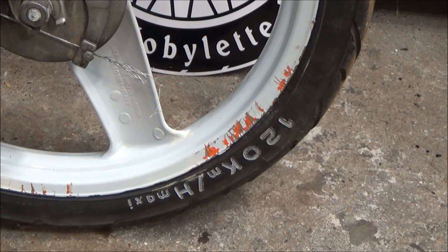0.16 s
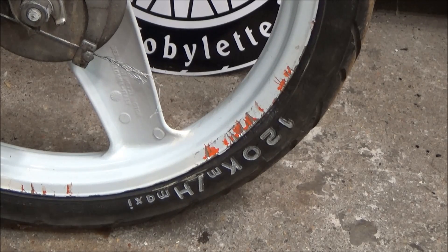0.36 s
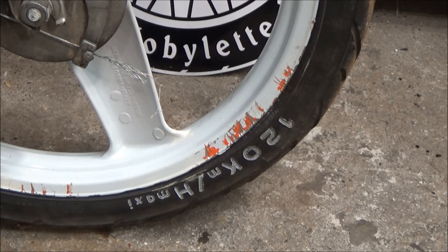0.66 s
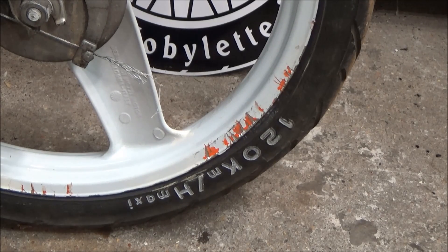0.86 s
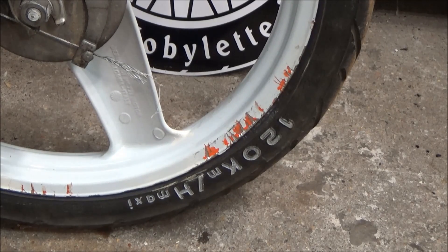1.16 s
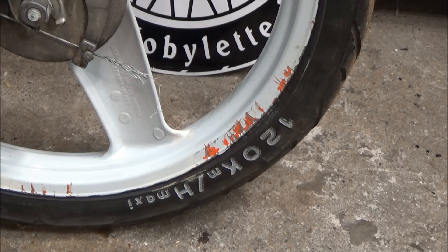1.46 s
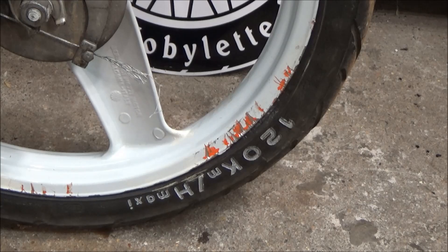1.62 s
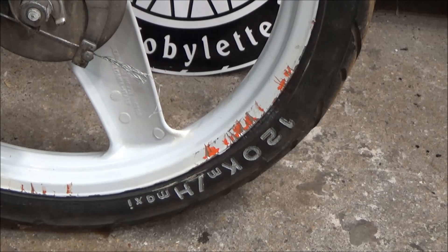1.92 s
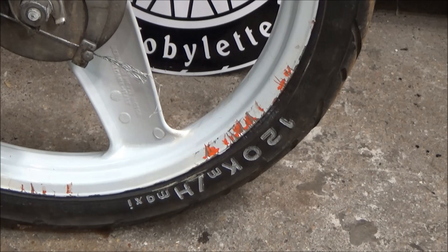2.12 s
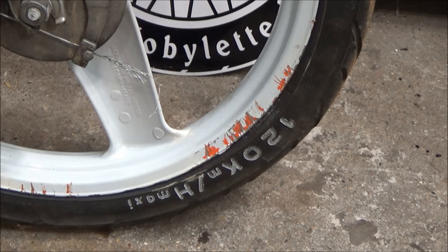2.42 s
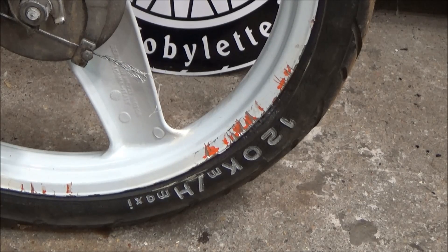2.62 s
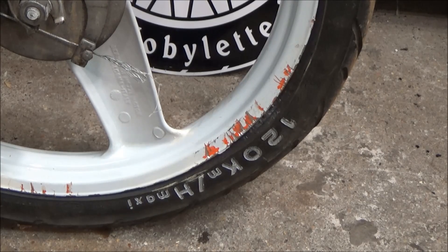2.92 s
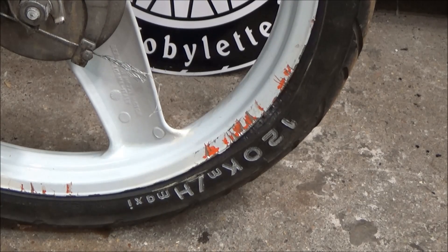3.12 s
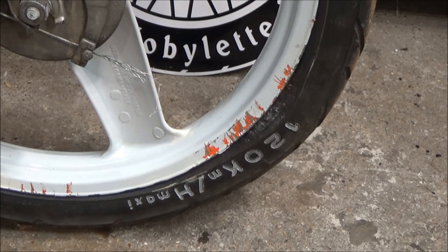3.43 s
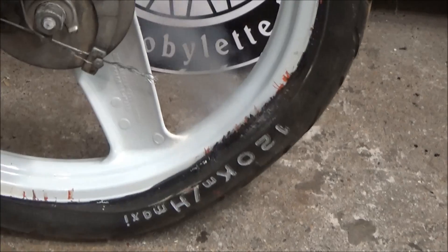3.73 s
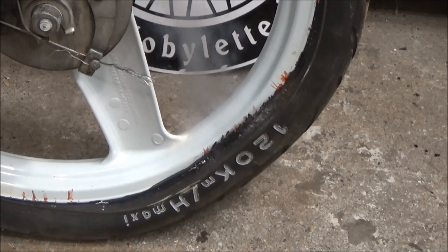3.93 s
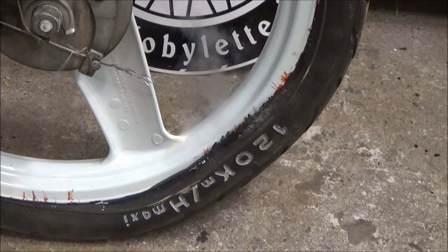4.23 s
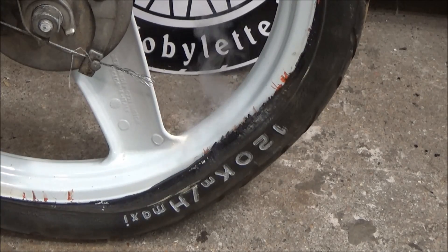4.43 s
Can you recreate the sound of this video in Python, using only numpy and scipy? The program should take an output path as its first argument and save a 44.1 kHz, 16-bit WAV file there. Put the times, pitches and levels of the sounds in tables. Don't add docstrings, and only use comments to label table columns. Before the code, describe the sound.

A small tyre on a cast wheel is overfilled indoors, heard close up. First a short valve puff and a few soft clicks and knocks over quiet room tone; then a piercing, steady air hiss, slowly rising, with hollow bead knocks. The bead stutters, the tyre tears and explodes in a dense limited blast. The wheel and room boom deeply while debris rustles faintly and dies away.

```python
import sys
import numpy as np
from scipy import signal
from scipy.fft import rfft, irfft
from scipy.io import wavfile

SR = 44100
rng = np.random.default_rng(int(sys.argv[2]) if len(sys.argv) > 2 else 0)


def bounce(signal):
    frames = np.transpose(np.atleast_2d(signal))
    limited = np.clip(frames, -1, 1)
    pcm = np.round(limited * 32767).astype(np.int16)
    wavfile.write(sys.argv[1], SR, pcm)


def to_linear_factor(level_db):
    exponent = np.asarray(level_db, float) / 20
    return 10 ** exponent


N = 201477
HZ = np.maximum(np.fft.rfftfreq(N, 1 / SR), 1)

# frequency in Hz, density in dB per Hz.
JET_SPECTRUM = [(290, -21.5), (500, -17.5), (1200, -20), (1310, -18), (1990, -15.5), (2170, -14.5),
                (2670, -18.5), (3320, -15), (3570, -6), (4120, -4.5), (5440, -13.5), (6290, -18),
                (11300, -9.5), (15100, -25), (16200, -38)]
# frequency in Hz, width in Hz, level in dB.
AIR_RESONANCES = [(2110, 32, -10), (2225, 22, -6), (3992, 40, 0), (3150, 35, -14), (3606, 35, -5.5),
                  (4065, 44, 2.5), (4350, 50, -6), (4517, 48, -2), (4915, 79, -10.5), (5940, 170, -15.5),
                  (6250, 84, -24), (6480, 40, -25), (7820, 166, -12), (8290, 76, -10), (8670, 90, -11.5),
                  (9820, 410, -12), (10720, 80, -9.5), (10900, 70, -8), (11500, 53, -7.5), (12200, 67, -14),
                  (11900, 66, -18), (12500, 200, -11), (12700, 130, -12), (13700, 200, -17),
                  (14200, 41, -16), (14800, 170, -19), (15200, 37, -23)]
# (frequency in Hz, left-right
# dB).
AIR_STEREO = [
    [(60, 1.0), (130, 0.84), (290, 8.5), (640, 0.5), (1410, 3), (3100, 4.3), (6820, 5), (15000, 2.15)],
    [(60, 0.0), (240, -2), (950, 1), (3770, -1), (15000, 2.5)],
]
# time in seconds, flow in dB.
PUFF_FLOW = [
    (0.0, -39),
    (0.06, -37),
    (0.095, -37),
    (0.14, -50.5),
    (.2, -61),
    (.38, -75),
]
# time in seconds, flow in dB.
FILL_FLOW = [
    (1.615, -66),
    (1.645, -34.5),
    (1.723, -35.5),
    (1.75, -36.5),
    (2.28, -34),
    (2.77, -31),
    (3.47, -29.5),
    (3.53, -30),
    (3.575, -36),
]
PUFF_JET_DB, PUFF_DULL_DB = -2.0, -2.5
JET_DB, JET_FOLLOWS_DB_PER_DB = -1, .2
LEAK_S, LEAK_DB, LEAK_HALF_S = 3.525, 3.5, 0.059
SING_DB_PER_S = 1

# frequency in Hz, density in dB per Hz.
BURST_SPECTRUM = [(53, -32), (90, -1), (107, -9), (205, -12.5), (323, -8), (360, 2.5), (402, -6.5),
                  (633, -9), (690, -5), (956, -7), (1750, -11.5), (10400, -20), (16000, -38)]
# (frequency in Hz, left-right dB).
BURST_STEREO = [
    [(60, 0.88), (130, 0.9), (290, 0.93), (640, 0.56), (1410, 0.61), (3100, 0.73), (6820, 0.75), (15000, 1)],
    [(60, -5), (240, 7), (950, 2), (3770, -0.5), (15000, 1.5)],
]
# low edge in Hz, high edge in Hz.
ROAR_RANGES = [(90, 220), (220, 650), (650, 1800), (1800, 6000), (6000, 16000)]
# level in dB, rise in seconds, fall in dB per second.
TEAR = [(-10.5, 0.027, 350), (-13, 0.0071, 157), (-13, 0.00044, 160), (-12, .0005, 290),
        (-19.5, .0005, 344)]
# level in dB, rise in seconds, sag in dB per second while emptying,
# first flash in dB over the level.
BLAST = [(-28.5, 0.048, 5, 2), (-20, 0.0075, 45, -7), (-9.5, 0.0089, 89, -21), (-14.5, .0007, 47, 1),
         (-20, .0007, 75, 10.5)]
# fall in dB per second, shop echo in dB, echo fall in dB per second.
AFTER_BLAST = [(50, -47, 36), (75, -44, 39), (175, -45, 54), (184, -44.5, 47), (144, -42, 66)]
# start in seconds, peak in dB.
FRONTS = [
    (3.5738, -3),
    (3.5786, -5),
    (3.5852, -6),
]
TEAR_S, BLAST_S, EMPTY_S = 3.574, 3.642, 3.761
FLASH_T60_S = 0.079
SLUMP_S, SLUMP_DB, SLUMP_HALF_S = 3.778, -25, 0.013

# frequency in Hz, level in dB, T60 in seconds.
BOOM_MODES = [(74, -0.5, 1.36), (143.3, -15, 1.38), (292, -15.5, 1.13), (356, -15, 1.39), (387, -20, 1.25),
              (443.6, -13.5, 1.01), (617, -19.5, 0.98), (695, -16, 0.81), (840, -25, 0.91),
              (870, -35, 0.72), (1150, -38, 2), (1217, -24, 0.79), (1420, -37, 0.61)]
# start in seconds, level in dB, rise in seconds.
BOOM_ONSETS = [
    (3.765, -13.5, 0.011),
    (3.655, -12.5, 0.0058),
    (3.582, -8, 0.0028),
]

# frequency in Hz, level in dB, T60 in seconds.
RIM_MODES = [(2020, -29, 1.5), (2134, 1, 1.4), (2216, -2, 1.4), (4237, -19, 1), (5230, -13, 1.1),
             (7710, -2, 1), (8070, -3.5, 1.13), (8530, -6, 1), (9140, -9, 0.99), (11460, -11, 0.82)]
# frequency in Hz, level in dB, T60 in seconds.
SPOKE_MODES = [(1112, -7, 2.0), (2290, -1.5, 0.98), (4000, 0.5, 0.99), (6600, -7, 1.8), (9765, 9, 0.34)]

# start in seconds, peak in dB, crack in dB, left-right dB.
KNOCKS = [
    (1.151, -40, 2.5, 4),
    (1.235, -22, -1.5, 2.5),
    (2.503, -20, -3, 2.5),
    (2.551, -20, -2, 1.5),
    (2.629, -22, -1.5, 3),
    (3.002, -19, -1, 2.5),
]
# frequency in Hz, level in dB, T60 in seconds.
TYRE_MODES = [(292, 8, 0.18), (355.6, 12, 0.12), (684, -5, 0.057), (916, -9, 0.33), (1150, -9, 0.22),
              (1394, -5, 0.082), (1900, -35, 0.082), (1760, -15, 0.29), (2180, -17, 0.31),
              (2780, -12, 0.099), (3020, -14, 0.13), (3305, -12.5, 0.14), (5000, -11.5, 0.2),
              (6316, -15, 0.32)]
# centre in seconds, peak in dB, frequency in Hz, half length in seconds.
SLIPS = [
    (3.532, -22.5, 1240, 0.00063),
    (3.545, -13, 1910, 0.0004),
    (3.55, -14, 1920, 0.00061),
    (3.5577, -14, 1900, 0.00047),
    (3.5646, -20, 1780, 0.0006),
    (3.569, -26, 1800, 0.0005),
    (3.6172, 0.5, 1310, 0.00032),
]
# start in seconds, peak in dB, frequency in Hz, T60 in seconds.
TICKS = [(.095, -19, 9000, 0.0066), (.578, -39.5, 8700, 0.0066), (.634, -35, 8850, 0.0063),
         (1.59, -33.5, 2900, 0.014), (1.644, -24, 5060, 0.017), (1.655, -16, 5130, 0.028),
         (1.716, -12.5, 3250, 0.025), (1.716, -14.5, 9300, 0.0083), (3.5312, -3, 8460, .008),
         (3.591, -6, 10500, 0.013), (3.607, -3.5, 11500, 0.0084), (3.607, -3.5, 5000, 0.0057),
         (4.128, -40, 7940, .008)]
# start in seconds, peak in dB, frequency in Hz, T60 in seconds.
THUDS = [
    (1.403, -31, 302, 0.044),
    (1.403, -32.5, 674, 0.032),
    (1.473, -39, 467, 0.075),
    (1.486, -33.5, 507, 0.07),
    (1.834, -31, 452, 0.033),
    (2.56, -31.5, 75, 0.096),
]
# start in seconds, peak in dB, frequency in Hz, T60 in seconds.
SQUEAKS = [
    (3.415, -23, 1620, 0.12),
    (4.012, -34, 1750, 0.14),
    (4.035, -33, 1700, 0.058),
]
ROOM_T60_S, ROOM_DB = 0.18, -10

# centre in seconds, level in dB, half length in seconds.
GUSTS = [
    (3.815, -36, 0.045),
    (3.92, -40.5, 0.042),
]
# centre in seconds, level in dB, half length in seconds,
# frequency in Hz, width in Hz.
HALO_PUFFS = [
    (3.82, -32.5, 0.046, 11200, 2500),
    (4.16, -58, .018, 14000, 3500),
]
WHISTLE_HZ, WHISTLE_RISE_HZ_PER_S = 11200, 3300

# frequency in Hz, density in dB per Hz.
GRIT_SPECTRUM = [(530, -47), (900, -22), (1320, -22), (1460, -8.5), (1880, -5.5), (4100, -7), (6110, -16.5),
                 (9650, -16.5), (13700, -34), (15400, -47), (16000, -74)]
# centre in seconds, scrape in dB, half length in seconds, rustle over scrape in dB.
SCRAPS = [
    (4.023, -50.5, 0.038, -5),
    (4.158, -56, 0.022, 2.5),
    (4.227, -53.5, 0.01, -4),
    (4.36, -44.5, 0.043, -2),
    (4.466, -53, 0.041, -3),
    (4.524, -46.5, 0.023, -2.5),
    (4.562, -47.5, .02, -2),
]
SCRAP_EDGE = 3.5

# frequency in Hz, density in dB per Hz.
FLOOR_SPECTRUM = [(260, -21), (450, -8), (589, -8.5), (635, -6.5), (782, -6), (1020, -7), (1400, -9),
                  (2360, -13), (2960, -13.5), (16000, -25.5)]
FLOOR_DB = -56
# (frequency in Hz, left-right dB).
FLOOR_STEREO = [
    [(60, 1), (240, 0.82), (950, 0.47), (3770, 0.35), (15000, 1)],
    [(60, 0.0), (240, 0.5), (950, 0.0), (3770, 0.099), (15000, 0.0)],
]
# frequency in Hz, width in Hz, level in dB.
HUM = [(575.4, 9.1, -64.5)]
# low edge in Hz, high edge in Hz, rest level in dB, climb start in seconds,
# climb in dB per second.
DRUMMING = [
    (45, 78.6, -64.5, 1.5, 5),
    (100, 450, -62.5, 0.22, 1.5),
]
DUCK_DB, RECOVER_DB_PER_S, CREEP_DB_PER_S = -14, 36, 0.9


def rms_one(x):
    return x / np.sqrt(np.mean(x ** 2) + 1e-20)


def at_hz(points):
    hz, value = np.transpose(points)
    return np.interp(np.log(HZ), np.log(hz), value)


def drift(rate_hz):
    r = np.exp(-80 * np.pi * rate_hz / SR)
    slow = signal.lfilter([1], [1, -2 * r, r * r], rng.standard_normal(N // 40 + 2002))[2000:]
    return np.interp(np.arange(N) / 40, np.arange(len(slow)), rms_one(slow))


def noise(spectrum, stereo):
    mid, side = rfft(rng.standard_normal((2, N)))
    alike = np.clip(at_hz(stereo[0]), 0, 1)
    lean = to_linear_factor(at_hz(stereo[1]) / 2)
    mid, side = np.sqrt(1 + alike) * mid, np.sqrt(1 - alike) * side
    pair = np.array([(mid + side) * lean, (mid - side) / lean])
    return irfft(to_linear_factor(at_hz(spectrum)) * pair, N)


def band(x, low_hz, high_hz):
    sos = signal.butter(3, [low_hz, high_hz], "band", fs=SR, output="sos")
    return rms_one(signal.sosfilt(sos, x))


def resonance(x, hz, width_hz):
    r = np.exp(-np.pi * width_hz / SR)
    poles = [1, -2 * r * np.cos(2 * np.pi * hz / SR), r * r]
    return signal.lfilter(np.array([1, 0, -1]) * (1 - r * r) / 2, poles, x)


def ring(clicks, hz, t60_s):
    r = to_linear_factor(-60 / (max(t60_s, .001) * SR))
    w = 2 * np.pi * hz / SR
    return signal.lfilter([0, np.sin(w)], [1, -2 * r * np.cos(w), r * r], clicks + 1e-18)


def add(out, piece, s, pan_db=0.):
    i = round(s * SR)
    piece = piece[:N - i]
    out[:, i:i + len(piece)] += piece * to_linear_factor([[pan_db / 2], [-pan_db / 2]])


def curve(rows, edge_s):
    s, db = np.transpose(rows)
    times = np.r_[s[0] - edge_s, s, s[-1] + edge_s]
    return np.interp(np.arange(N) / SR, times, np.r_[-120, db, -120])


def swell(s, half_s, edge=2):
    return np.exp(-np.abs((np.arange(N) / SR - s) / half_s) ** edge)


def room(x, t60_s, level_db):
    t = np.arange(round(.4 * SR)) / SR
    tail = rng.standard_normal((2, len(t))) * to_linear_factor(-60 * t / t60_s) * (t > .002)
    tail = signal.lfilter([1], [1, -.4], tail)
    tail = tail / np.sqrt(np.sum(tail[0] ** 2))
    return to_linear_factor(level_db) * signal.fftconvolve(x, tail, axes=1)[:, :N]


def air():
    jet = noise(JET_SPECTRUM, AIR_STEREO)
    white = noise([(100, 0), (16000, 0)], AIR_STEREO)
    sung = sum((-1) ** k * to_linear_factor(db + 2.0 * drift(2.4)) * resonance(white, hz, width_hz)
               for k, (hz, width_hz, db) in enumerate(AIR_RESONANCES))
    hiss = jet + to_linear_factor(3.0 + SING_DB_PER_S * (np.arange(N) / SR - 2.5)) * sung
    hiss = hiss + room(hiss[:1], t60_s=.08, level_db=-6)

    puff = to_linear_factor(curve(PUFF_FLOW, edge_s=.02))
    fill_db = curve(FILL_FLOW, edge_s=.005)
    sharp_db = JET_DB + JET_FOLLOWS_DB_PER_DB * (fill_db + 33) + LEAK_DB * swell(LEAK_S, LEAK_HALF_S)
    body = puff + to_linear_factor(fill_db)
    bright = to_linear_factor(PUFF_JET_DB) * puff + to_linear_factor(fill_db + sharp_db)
    dull = to_linear_factor(PUFF_DULL_DB) * puff * swell(0.063, 0.022)
    flow = body * band(hiss, 326, 7100) + bright * band(hiss, 7300, 16500) + dull * band(hiss, 2440, 3360)
    return to_linear_factor(0.25 * drift(25)) * flow


def burst():
    roar = noise(BURST_SPECTRUM, BURST_STEREO)
    lumps = drift(28)
    torn, opened, empty = (np.maximum(np.arange(N) / SR - s, 0) for s in (TEAR_S, BLAST_S, EMPTY_S))
    out = to_linear_factor(SLUMP_DB) * swell(SLUMP_S, SLUMP_HALF_S) * band(roar, *ROAR_RANGES[0])
    for edges_hz, tear_row, blast_row, after_row in zip(ROAR_RANGES, TEAR, BLAST, AFTER_BLAST):
        tear_db, tear_rise_s, tear_fall = tear_row
        level_db, rise_s, sag, flash_db = blast_row
        drop, echo_db, fade = after_row
        tear = (1 - np.exp(-torn / tear_rise_s)) * to_linear_factor(tear_db - tear_fall * torn)
        outflow = to_linear_factor(level_db - sag * (opened - empty) - drop * empty)
        echo = to_linear_factor(echo_db - fade * empty)
        blast = (1 - np.exp(-opened / rise_s)) * (outflow + echo)
        flash = (opened > 0) * to_linear_factor(level_db + flash_db - 60 * opened / FLASH_T60_S)
        envelope = tear * to_linear_factor(2.0 * lumps) + (blast + flash) * to_linear_factor(0.75 * lumps)
        out += envelope * band(roar, *edges_hz)
    out = 0.69 * np.tanh(out / .75)
    for s, db in FRONTS:
        add(out, to_linear_factor(db) * np.linspace(1, -1, round(.0005 * SR)), s)
    return out


def boom():
    out, t = np.zeros((2, N)), np.arange(N) / SR
    thump_modes = [(133.6, 1.0, 0.1), (204, -6.0, 0.19)]
    mode_sets = BOOM_MODES[:2], BOOM_MODES[2:], thump_modes
    for (s, db, rise_s), modes in zip(BOOM_ONSETS, mode_sets):
        age = np.maximum(t - s, 0)
        waves = 0
        for hz, mode_db, t60_s in modes:
            turns = hz * age + rng.random() - np.array([[0], [.11]])
            waves = waves + to_linear_factor(mode_db - 60 * age / t60_s + 1.1 * drift(11)) * np.sin(2 * np.pi * turns)
        out += to_linear_factor(db) * (1 - np.exp(-age / rise_s)) * waves * to_linear_factor([[2.5], [-2.5]])
    return out


def shimmer(modes, s, level_db, width_hz, life):
    t = np.arange(N) / SR - s
    white = noise([(100, 0), (16000, 0)], AIR_STEREO)
    lines = 0
    for hz, db, t60_s in modes:
        line = resonance(resonance(white, hz, width_hz), hz, width_hz)
        lines = lines + to_linear_factor(db - 60 * t / (life * t60_s)) * rms_one(line)
    return to_linear_factor(level_db) * np.clip(t / 0.038, 0, 1) * lines


def rim():
    puffed = shimmer(RIM_MODES, 0.11, level_db=-46.5, width_hz=81, life=0.75)
    blasted = shimmer(SPOKE_MODES, 3.86, level_db=-53.5, width_hz=30, life=0.93)
    return puffed + blasted


def knocks():
    out, t = np.zeros((2, N)), np.arange(round(.3 * SR)) / SR
    shared, own = rng.standard_normal(len(t)), rng.standard_normal((len(KNOCKS), len(t)))
    late = np.exp(-((t - .015) / 0.000088) ** 2)
    hollow = sum(to_linear_factor(d) * ring(late, hz, .5 * t60_s) for hz, d, t60_s in TYRE_MODES[:2])
    hollow = hollow / abs(hollow).max()
    highpass = signal.butter(4, 170, "high", fs=SR, output="sos")
    for (s, db, crack_db, pan_db), g in zip(KNOCKS, shared + 0.61 * own):
        strike = g * to_linear_factor(-60 * t / 0.04)
        wall = sum(to_linear_factor(d) * ring(strike, hz, 0.23 * t60_s) for hz, d, t60_s in TYRE_MODES[2:])
        crack = band(g, 176, 2200) * to_linear_factor(-60 * t / 0.17)
        crack = crack + to_linear_factor(-9) * band(g, 3600, 12700) * to_linear_factor(-60 * t / 0.098)
        piece = hollow + to_linear_factor(crack_db + 3.0) * wall / abs(wall).max() + to_linear_factor(crack_db - 9.0) * crack
        add(out, to_linear_factor(db) * signal.sosfilt(highpass, piece), s - .002, pan_db)
    return out


def slips():
    out, t = np.zeros((2, N)), np.arange(-88, 200) / SR
    for (s, db, hz, half_s), g in zip(SLIPS, rng.standard_normal((len(SLIPS), len(t)))):
        blip = np.exp(-(t / half_s) ** 2) * (np.cos(2 * np.pi * hz * t) + 0.1 * g)
        add(out, to_linear_factor(db) * blip, s + t[0])
    return out


def snaps(events, grit_share, sharpness):
    out, t = np.zeros((2, N)), np.arange(round(.2 * SR)) / SR
    for (s, db, hz, t60_s), g in zip(events, rng.standard_normal((len(events), len(t)))):
        grit = resonance(g * to_linear_factor(-60 * t / max(t60_s, .001)), hz, hz / sharpness)
        tone = ring((t == 0) * 1., hz, t60_s)
        add(out, to_linear_factor(db) * (grit_share * grit / abs(grit).max() + (1 - grit_share) * tone), s)
    return out


def whistle():
    hz = WHISTLE_HZ + WHISTLE_RISE_HZ_PER_S * np.clip(np.arange(N) / SR - EMPTY_S, 0, .3)
    phase = 2 * np.pi * np.cumsum(hz) / SR
    gusts = sum(to_linear_factor(db) * swell(s, half_s) for s, db, half_s in GUSTS)
    white = rng.standard_normal(N)
    halo = 0
    for s, db, half_s, mid_hz, width_hz in HALO_PUFFS:
        puff = resonance(resonance(white, mid_hz, width_hz), mid_hz, width_hz)
        halo = halo + to_linear_factor(db) * swell(s, half_s) * rms_one(puff)
    return gusts * (drift(330) * np.sin(phase) + drift(330) * np.cos(phase)) + halo


def debris():
    grains = noise(GRIT_SPECTRUM, BURST_STEREO) * to_linear_factor(1.8 * drift(140))
    scrape, rustle = band(grains, 940, 6400), band(grains, 5200, 17000)
    return sum(to_linear_factor(db) * swell(s, half_s, SCRAP_EDGE) * (scrape + to_linear_factor(rustle_db) * rustle)
               for s, db, half_s, rustle_db in SCRAPS)


def workshop():
    t = np.arange(N) / SR
    recover_db = np.minimum(DUCK_DB + RECOVER_DB_PER_S * (t - BLAST_S), 0)
    gain = to_linear_factor(np.where(t < BLAST_S, CREEP_DB_PER_S * t, recover_db))
    tone = to_linear_factor(FLOOR_DB + 0.37 * drift(1.1)) * rms_one(noise(FLOOR_SPECTRUM, FLOOR_STEREO))
    white = noise([(20, 0), (16000, 0)], FLOOR_STEREO)
    hum = sum(to_linear_factor(db) * rms_one(resonance(white, hz, width_hz)) for hz, width_hz, db in HUM)
    rumble = 0
    for low_hz, high_hz, db, s, climb in DRUMMING:
        level_db = db + climb * np.maximum(t - s, 0) * (t < BLAST_S)
        rumble = rumble + to_linear_factor(level_db) * band(white, low_hz, high_hz)
    return gain * (tone + hum + rumble)


def scene():
    hits = knocks() + snaps(TICKS, grit_share=0.82, sharpness=3.7)
    hits = hits + snaps(THUDS, grit_share=0.62, sharpness=2.2)
    hits = hits + snaps(SQUEAKS, grit_share=0.85, sharpness=7.1)
    tyre = air() + burst() + boom() + rim() + slips() + whistle() + debris()
    return hits + room(hits, ROOM_T60_S, ROOM_DB) + tyre + workshop()


def top_cut(x):
    return signal.sosfilt(signal.butter(12, 16640, fs=SR, output="sos"), x)


def record(dry):
    limited = 1.18 * np.tanh(dry / 1.028)
    lowpass = signal.cheby2(10, 35, 16600, fs=SR, output="sos")
    return top_cut(signal.sosfilt(lowpass, limited))


dry = scene()
out = record(dry)
bounce(out)
```